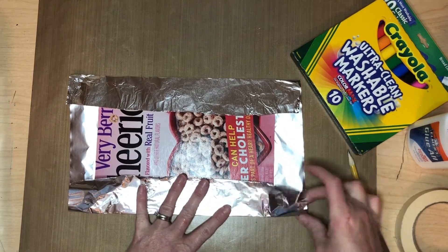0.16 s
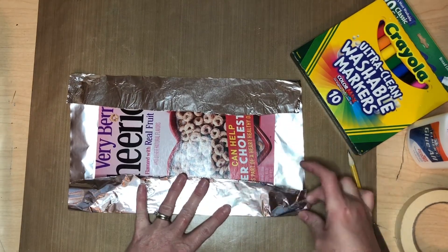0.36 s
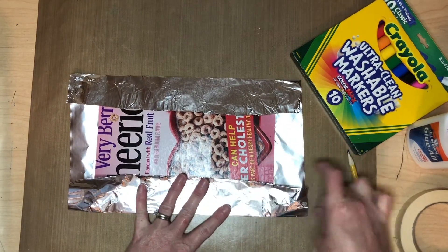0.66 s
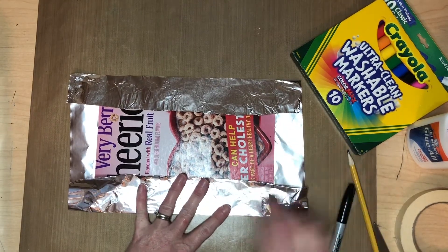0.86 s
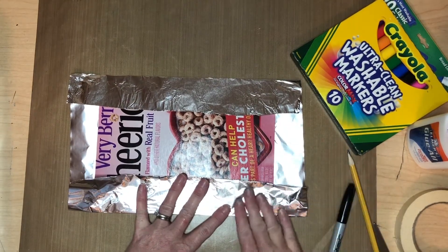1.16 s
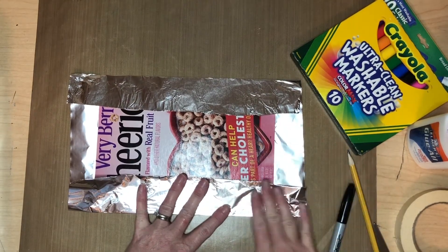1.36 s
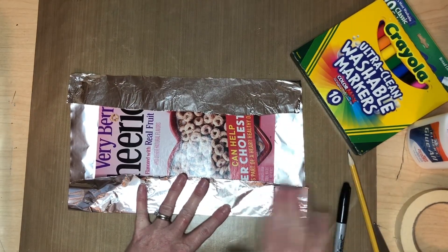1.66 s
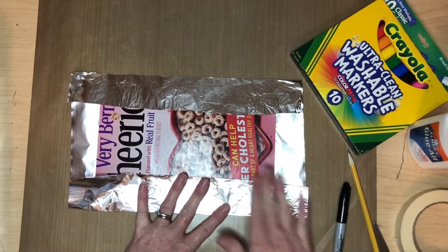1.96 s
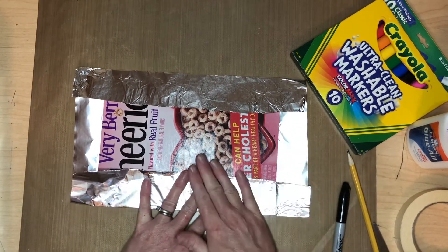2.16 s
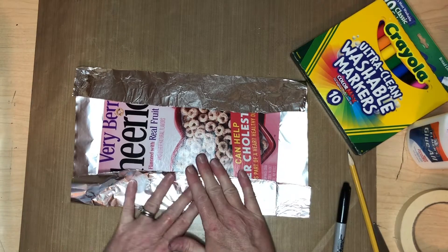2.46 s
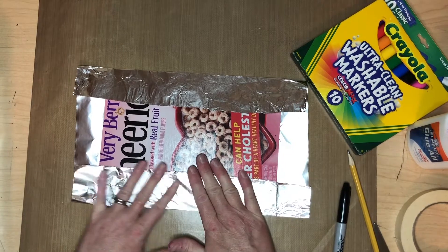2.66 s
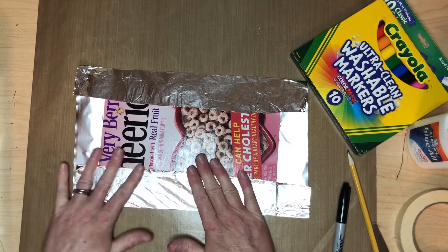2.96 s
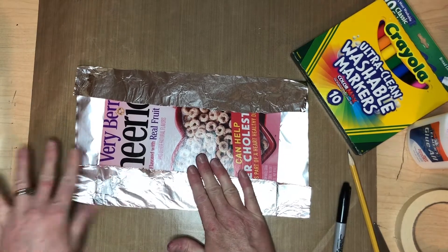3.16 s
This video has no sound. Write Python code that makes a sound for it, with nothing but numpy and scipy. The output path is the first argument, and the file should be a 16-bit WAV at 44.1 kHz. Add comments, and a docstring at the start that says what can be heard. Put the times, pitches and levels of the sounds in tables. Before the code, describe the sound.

Aluminium foil crackles and snaps as hands fold it around cardboard and smooth it flat.

```python
"""Aluminium foil crackles and snaps as hands fold it round a piece of cardboard and smooth it flat,
on a table close to the microphone in a small room. Creases buckle with sharp snaps over the fine
crackle of tiny wrinkles; a loose flap scrapes and gliding fingers hiss. The hands thump the table,
and the card's edge knocks down twice as the left hand lets go."""
import sys
import numpy as np
from scipy import signal
from scipy.io import wavfile

SR = 44100
rng = np.random.default_rng(int(sys.argv[2]) if len(sys.argv) > 2 else 0)


def wav_record(signal):
    """Record a signal, one row per channel, as 16-bit PCM in the file named by sys.argv[1]."""
    frames = np.transpose(np.atleast_2d(signal))
    bounded = np.clip(frames, -1, 1)
    # unit amplitude maps onto the largest positive 16-bit level
    quanta = np.round(bounded * 32767).astype(np.int16)
    wavfile.write(sys.argv[1], SR, quanta)


N = 145530

# Levels are relative; gains further down offset them.
# room tone: f/Hz, level/dB
ROOM_TONE = [(20, -22), (55, 0), (130, 0), (250, -1), (600, -7), (1000, -11), (1700, -10.5), (2500, -16.5),
             (6000, -22), (10000, -29.5), (16000, -40)]
# faint ring at the start: f/Hz, level/dB, t60/s
OPENING_MODES = [(590, -67.5, 0.98), (680, -56, 0.13), (1680, -70, 0.76), (1680, -62, 0.19),
                 (2250, -62, 0.15), (3100, -54, 0.16), (4530, -54, 0.14)]

# crackle under the fingers: t/s, treble level/dB, upper-mid level/dB
RUB_LEVELS = [(0, -62.5, -51.5), (0.06, -71, -65.5), (0.12, -100, -80), (0.14, -47.5, -46.5),
              (0.19, -62, -51.5), (0.22, -52, -51), (0.28, -50, -45.5), (0.36, -60, -56),
              (0.42, -72, -65.5), (0.45, -55, -60), (0.485, -61, -55), (0.515, -65, -56),
              (0.55, -53.5, -52.5), (0.6, -40.5, -41.5), (0.645, -46, -49), (0.67, -58.5, -78),
              (0.76, -77, -93), (0.975, -105, -99), (1.03, -46, -48), (1.13, -59, -51), (1.18, -58, -55),
              (1.28, -51, -53), (1.36, -44.5, -52), (1.44, -49.5, -53.5), (1.51, -59, -54.5),
              (1.6, -56.5, -66), (1.63, -80, -57), (1.66, -80, -100), (1.76, -82, -78), (1.785, -49, -54.5),
              (1.87, -50, -58), (1.94, -66, -64.5), (2.05, -55.5, -59), (2.08, -47, -48.5),
              (2.135, -57.5, -56), (2.225, -54, -46.5), (2.27, -59, -57), (2.32, -54, -50),
              (2.39, -50.5, -51), (2.48, -58, -57), (2.55, -50.5, -46), (2.63, -35.5, -42),
              (2.69, -48.5, -50.5), (2.74, -43.5, -50.5), (2.79, -51, -56.5), (2.875, -40.5, -49),
              (2.915, -52.5, -47.5), (2.945, -64, -67), (2.98, -51.5, -49), (3.03, -52.5, -61.5),
              (3.09, -46, -50), (3.145, -49, -57.5), (3.18, -87, -75), (3.29, -93, -82)]
# low rustle of foil and card: t/s, level/dB
FLEX_LEVEL = [(0, -56), (0.12, -74.5), (0.14, -88), (0.28, -78), (0.42, -86), (0.45, -82), (0.55, -76),
              (0.645, -86), (0.7, -72), (0.975, -100), (1.03, -69), (1.4, -71), (1.6, -80), (1.76, -69),
              (1.785, -56), (1.95, -68), (2.05, -65.5), (2.14, -55.5), (2.205, -58.5), (2.235, -47.5),
              (2.27, -57.5), (2.48, -66.5), (2.62, -56), (2.83, -57), (2.9, -52.5), (2.945, -61.5),
              (3.1, -56.5), (3.19, -72), (3.29, -71)]
# spectra of the crackle's treble, upper mids and low rustle: f/Hz, level/dB
TREBLE_TONE = [(3000, -27), (5200, -7), (6700, -1.5), (9200, -2.5), (12000, -9), (16000, -9)]
MID_TONE = [(900, -15), (2000, -5.5), (3400, 0), (5200, -3.5), (7000, -8), (12000, -47)]
FLEX_TONE = [(40, -17), (120, 8.5), (300, 0.5), (550, 4.5), (850, -2), (1200, 5), (2000, 4), (3000, -20.5),
             (6000, -24.5)]
# smooth hiss in the crackle, small while folding, large while sliding: t/s, share (0-1)
HISS_SHARE = [(.5, .25), (.6, .6), (.7, .9), (1, .5), (1.35, .5), (1.5, .85), (2, .8), (2.1, .35),
              (2.48, .4), (2.58, .8), (2.9, .9)]
GRAINS_PER_S, GRAIN_SPREAD_DB, GRAIN_S = 1100, 2, 0.00051
TICKS_PER_S, TICK_SPREAD_DB, TICK_DB = 130, 2, 8  # sharper single wrinkles
FLUTTER_DB, FLUTTER_HZ = 2.56, 66.5  # the fingertips grip and slip
BEND_DB, BEND_HZ, SHAPE_S = 2.1, 150, .04  # foil resonances: depth, width, time in one shape

# creases buckling: t/s, ring f/Hz, ring level/dB, crack level/dB, flap level/dB
CREASES = [(0.1315, 4050, -45, -64, -58), (0.1404, 3320, -44, -53, -45.5), (0.1466, 4400, -49, -51, -58),
           (0.186, 3570, -48, -60, -57), (0.2018, 3380, -34, -35.5, -38.5),
           (0.2079, 4230, -36.5, -55, -40.5), (0.2277, 3380, -48, -52, -59),
           (0.2821, 3450, -39.5, -60, -42.5), (0.2924, 7600, -36.5, -44, -47),
           (0.3185, 2850, -36.5, -44.5, -51), (0.3466, 4100, -44, -61, -56),
           (0.3771, 2950, -45.5, -70, -51.5), (0.3948, 3040, -42, -58, -53), (0.4305, 3170, -47, -72, -49),
           (0.438, 3030, -38, -41.5, -43.5), (0.458, 3470, -45.5, -56, -59),
           (0.4635, 3300, -42, -46.5, -47.5), (0.502, 2770, -46, -69, -47.5),
           (0.5102, 3400, -45.5, -45.5, -45), (0.5215, 7000, -47, -48, -53),
           (0.5271, 2400, -47.5, -64, -51), (0.6135, 3400, -34.5, -71, -46.5),
           (0.6276, 3260, -36.5, -60, -43.5), (0.6413, 3900, -33, -41, -55),
           (0.6456, 4040, -39.5, -57, -45.5), (0.9881, 3950, -44, -45, -49), (1.024, 4000, -45, -52, -52),
           (1.0485, 3980, -42, -44, -47), (1.0543, 4950, -34.5, -61, -50), (1.081, 10200, -39.5, -42, -57),
           (1.1445, 4140, -33, -46, -53), (1.1665, 9000, -39, -43, -50), (1.1788, 6000, -32.5, -45, -57.5),
           (1.193, 5800, -32, -42.5, -40), (1.203, 4230, -36.5, -51, -79), (1.234, 4870, -33, -38.5, -60),
           (1.2372, 4600, -32, -37, -64), (1.2549, 4370, -36.5, -60, -62), (1.2632, 6640, -33, -44, -58),
           (1.297, 4400, -45, -66, -39), (1.3089, 4140, -36.5, -33, -49), (1.336, 7160, -32, -54, -68),
           (1.3414, 6500, -42, -37, -61), (1.3482, 7400, -39.5, -57, -64), (1.3558, 9500, -47, -39, -52),
           (1.3967, 6740, -44, -64, -74), (1.4101, 7060, -34.5, -43, -60), (1.423, 7750, -44, -53, -74),
           (1.4333, 9100, -45, -37, -55), (1.4735, 5000, -51, -55, -57), (1.4915, 4200, -48, -60, -66),
           (1.6245, 10000, -52, -56, -74), (1.7714, 10000, -30, -36, -43.5), (1.802, 9500, -47, -47, -66),
           (1.8565, 8700, -36.5, -44, -72), (2.0685, 9100, -61, -43.5, -44),
           (2.0807, 2460, -44, -42, -35.5), (2.0851, 8400, -35, -39, -35.5), (2.128, 8850, -63, -59, -71),
           (2.165, 4600, -42.5, -42.5, -44), (2.18, 3970, -47, -55, -49), (2.1855, 4930, -36.5, -40.5, -49),
           (2.2172, 5930, -45.5, -48.5, -45.5), (2.2372, 9500, -63, -48, -46), (2.258, 9000, -65, -52, -51),
           (2.2864, 9650, -36.5, -39.5, -65), (2.302, 5700, -38, -40, -48.5), (2.3368, 8300, -58, -48, -73),
           (2.3486, 6300, -35, -37, -72), (2.3751, 9650, -43.5, -39.5, -50),
           (2.4109, 7800, -36, -38.5, -47), (2.4418, 7400, -32.5, -35, -44),
           (2.4967, 8400, -49.5, -51, -45.5), (2.5299, 3300, -40, -53, -51), (2.5338, 9500, -45, -38, -48),
           (2.5747, 3100, -40, -57, -46), (2.5987, 7800, -49, -44, -44), (2.6109, 7160, -49, -49, -51),
           (2.6324, 5040, -40.5, -44, -49), (2.816, 6750, -42.5, -64, -46), (2.9574, 6960, -44.5, -49, -44),
           (3.109, 7200, -54, -43, -49), (3.139, 7860, -60, -43, -66), (3.1555, 9600, -43.5, -44.5, -53.5)]
# spectra of a snap's ring, top-end crack and low flap of the sheet: f/Hz, level/dB
RING_TONE = [(900, -64.5), (2000, -8.5), (3200, -1), (5000, -2), (8500, 0.5), (11000, -11.5), (16000, -22)]
CRACK_TONE = [(4000, -20.5), (7800, -3.5), (9500, 4.5), (12500, -4.5), (16000, -6)]
FLAP_TONE = [(200, -22.5), (700, -27.5), (1000, -7), (1250, -2.5), (1800, -7), (2600, -9), (5000, -62)]
# a crease rattles long in loose foil, briefly when pressed on the card: t/s, decay/s
RATTLE_DECAY = [(.13, 0.0088), (.3, 0.0038), (.65, 0.0079), (1.04, 0.0087), (1.06, 0.0018), (1.15, 0.0016),
                (1.25, 0.0006), (1.31, 0.0027), (1.41, 0.00042), (1.77, 0.0054), (2.09, 0.0029),
                (2.128, .0006), (2.187, 0.0054), (2.24, 0.00065), (2.3, .005), (2.35, 0.005),
                (2.53, 0.0074), (2.6, 0.00062), (3.15, 0.0018)]
# a taut crease gives way at once, a rolling one gradually: t/s, rise/s
CREASE_RISE = [(.2, .002), (.28, .0003), (.44, .0003), (.465, .002), (.99, .003), (1.049, .001), (1.054, 0),
               (1.49, 0), (1.62, .004), (1.77, .0004), (1.86, .0015), (2.165, .0003), (2.187, .003),
               (2.286, .0005), (2.303, .003), (2.34, 0), (2.44, .001), (2.58, 0)]
RING_OCTAVES, RING_LIFT_DB = 0.34, 9.5  # peak round each crease's own pitch
REFLECTION_S, REFLECTION_DB = .003, -7  # typical delay and level of a reflection of the pulse
RATTLE_DB, CRACK_DB, FLAP_DB, FLAP_S = -16, 1.5, -5.5, 0.0062
SPREAD_S, SPREAD_DB = 0.0092, -13  # the snap spreads through the whole sheet

# a raised flap scraping: t/s, length/s, level/dB
FLAP_SCRAPES = [(0.13, 0.042, -53), (0.202, 0.01, -38), (0.22, 0.082, -58), (0.427, 0.022, -60),
                (2.08, 0.015, -47), (2.21, 0.053, -51.5)]
# air pocket under the flap: f/Hz, level/dB
POCKET_TONE = [(600, -40), (950, -9.5), (1120, -3.5), (1330, 3.5), (1480, -9.5), (1700, -31), (2600, -45)]
# hands patting the card on the table: t/s, pat level/dB, pat f/Hz, table level/dB
HAND_PATS = [(0.289, -60, 143, -73), (0.317, -49.5, 397, -66.5), (.99, -45, 134, -58),
             (1.77, -42.5, 288, -65), (1.776, -31.5, 124.5, -42), (1.855, -49.5, 151, -59.5),
             (2.083, -36, 243, -64), (2.092, -39, 121, -45), (2.574, -54, 89, -68), (2.75, -48.5, 315, -64),
             (2.782, -41.5, 123, -64), (2.806, -40.5, 270, -59), (2.984, -42, 289, -64.5)]
PAT_CYCLES = 1.33  # a pat swells over this many cycles, then the flesh damps it
# modes of the table: f/Hz, level/dB, t60/s
TABLE_MODES = [(59, -2, 0.27), (111, 10, 0.067), (136.5, 6, 0.26), (169, -7.5, 0.14), (222, -9, 0.19),
               (268, -4, 0.18), (372, -13.5, 0.12), (407, 3, 0.035)]
# hand pressing along the fold, palm brushing the card: t/s, level/dB
PRESS_LEVEL = [(1.05, -100), (1.15, -57.5), (1.33, -60), (1.6, -79), (2.1, -70), (2.5, -70), (2.6, -61.5),
               (2.75, -73), (3.0, -64), (3.2, -110)]
PALM_LEVEL = [(.98, -70.5), (1.1, -68), (1.3, -65), (1.42, -55.5), (1.52, -64.5), (1.65, -78.5),
              (2.05, -66.5), (2.2, -66.5), (2.45, -62.5), (2.56, -51), (2.7, -76), (2.78, -52.5),
              (2.95, -61.5), (3.05, -74), (3.2, -69)]
# low rumble of the pressing, dull brush of the palm: f/Hz, level/dB
PRESS_TONE = [(20, -19), (48, 0.5), (70, -2), (130, -7.5), (280, -41), (600, -49), (1500, -83)]
PALM_TONE = [(80, -24), (170, -9.5), (270, 3), (420, -2), (620, -12.5), (1200, -17)]
# the card's edge tapping down: t/s, level/dB
EDGE_KNOCKS = [(1.296, -61), (2.8599, -32), (2.8736, -32)]
# modes of the card: f/Hz, level/dB, t60/s
CARD_MODES = [(437, 1, 0.011), (606, -4.5, 0.039), (665, -7, 0.032), (932, -3.5, 0.025), (1136, -9.5, 0.1),
              (1165, -8, 0.084), (1234, 2, 0.027), (1430, -1, 0.012), (1660, -4, 0.021), (2030, -5.5, 0.02)]
# fingers gliding over flat foil: t/s, length/s, level/dB
STROKES = [(1.31, 0.28, -53), (1.78, 0.16, -54), (1.598, 0.045, -62), (2.3, 0.12, -55)]
# bright sheen of a stroke: f/Hz, level/dB
STROKE_TONE = [(3000, -26), (7000, -6), (10000, -2), (15000, -6)]

# decay of the small room: f/Hz, t60/s
ROOM_DECAY = [(100, 0.4), (1000, 0.36), (4000, 0.26), (9000, 0.14), (16000, 0.076)]
# resonances of the table and its surroundings: f/Hz, width/Hz, lift/dB
TABLE_RESONANCES = [(751, 32, 6), (1057, 24, 2), (3590, 130, 2.5), (4600, 49, 2.5), (5720, 35, -1),
                    (6100, 57, 2)]
TAIL_DB, EARLY_DB, EARLY_S = -16.5, -10.5, 0.0037
ECHO_LOW_CUT_HZ = 300  # low cut on the echo, keeping the bass dry

TIME = np.arange(N) / SR
BIN_HZ = np.fft.rfftfreq(4096, 1 / SR)


def amp(db):
    """Decibels to gain."""
    return 10 ** (np.asarray(db) / 20)


def unit(x):
    """Scales to rms 1."""
    return x / np.sqrt(np.mean(x ** 2) + 1e-20)


def spectrum(points, hz=BIN_HZ):
    """Interpolates a table on a log-frequency axis."""
    f, value = np.transpose(points)
    return np.interp(np.log(hz + 1), np.log(f), value)


def level(points, column=1):
    """One dB column of a time curve, as gain per sample."""
    rows = np.array(points)
    return amp(np.interp(TIME, rows[:, 0], rows[:, column]))


def add(mix, s, sound):
    """Adds a sound into the mix at time s."""
    part = mix[max(0, round(s * SR)):][:len(sound)]
    part += sound[:len(part)]


def colour(x, db):
    """Minimum-phase filter with the given dB per bin."""
    log_gain = np.log(amp(np.r_[db, db[-2:0:-1]]))
    taps = np.fft.ifft(np.exp(np.conj(signal.hilbert(log_gain)))).real
    return signal.fftconvolve(x, taps[:len(db)])[:len(x)]


def noise(tone):
    """Steady noise of rms 1 with the given spectrum."""
    return unit(colour(rng.standard_normal(N), spectrum(tone)))


def ring(modes):
    """The dying modes of a struck body, alternating in sign."""
    t = np.arange(SR // 3) / SR
    return sum(amp(db) * np.exp(-np.log(1000) * t / t60) * np.sin(2 * np.pi * hz * t) * (-1) ** k
               for k, (hz, db, t60) in enumerate(modes))


def background(tone_db=-72.5, rise_s=0.0024):
    """Quiet room tone, with a faint ring dying away at the start."""
    out = amp(tone_db) * noise(ROOM_TONE)
    fading = ring(OPENING_MODES)
    add(out, 0, fading * np.minimum(TIME[:len(fading)] / rise_s, 1))
    return out


def foil_shape():
    """Random resonances of the foil in one of its shapes, in dB per bin."""
    knots = np.arange(0, SR / 2, BEND_HZ)
    return BEND_DB * np.interp(BIN_HZ, knots, rng.standard_normal(len(knots)))


def bending(x):
    """The foil passes from one shape to the next, so its resonances keep shifting."""
    out, hop = np.zeros(N), round(SHAPE_S * SR)
    padded = np.pad(x, (hop, 2 * hop))
    window = np.sin(np.pi * np.arange(2 * hop) / (2 * hop)) ** 2
    for start in range(0, N + hop, hop):
        part = colour(padded[start:start + 2 * hop] * window, foil_shape())
        add(out, (start - hop) / SR, part[max(0, hop - start):])
    return out


def crackle(treble_db=-0.5, mid_db=-2, flex_db=-1.5):
    """Tiny wrinkles give way under the fingers: ticks while folding, smoother hiss while sliding."""
    wrinkles = amp(GRAIN_SPREAD_DB * np.minimum(rng.exponential(1, N), 5))
    wrinkles *= rng.random(N) < GRAINS_PER_S / SR
    power = signal.lfilter([1], [1, -np.exp(-2 / (GRAIN_S * SR))], wrinkles ** 2)
    smooth = np.interp(TIME, *np.transpose(HISS_SHARE))
    envelope = np.sqrt(smooth + (1 - smooth) * power / power.mean())
    grip = signal.sosfilt(signal.butter(2, FLUTTER_HZ, fs=SR, output="sos"), rng.standard_normal(N))
    envelope *= amp(FLUTTER_DB * unit(grip))
    ticks = 2 * (1 - smooth) * amp(TICK_DB + TICK_SPREAD_DB * np.minimum(rng.exponential(1, N), 3))
    ticks *= rng.random(N) < TICKS_PER_S / SR
    out = np.zeros(N)
    for tone, db, gain in [(TREBLE_TONE, treble_db, level(RUB_LEVELS)),
                           (MID_TONE, mid_db, level(RUB_LEVELS, column=2)),
                           (FLEX_TONE, flex_db, level(FLEX_LEVEL))]:
        drive = ticks + envelope * rng.standard_normal(N)
        out += amp(db) * gain * unit(colour(drive, spectrum(tone)))
    return bending(out)


def scrapes(fade_s=0.0057):
    """Short slides of the loose flap, heard through the air pocket under it."""
    gate = np.zeros(N)
    for s, length, db in FLAP_SCRAPES:
        gate += amp(db) * np.clip(np.minimum(TIME - s, s + length - TIME) / fade_s, 0, 1)
    return gate * noise(POCKET_TONE)


def snaps():
    """A crease buckles with a pulse and a rattle, and a weaker reflection of the pulse follows; the sheet rings
    and its flap clacks."""
    out = np.zeros(N)
    t = np.arange(0, .06, 1 / SR)
    attack = t < .005  # the first 5 ms set each part's level
    ring_tone, crack_tone, flap_tone = map(spectrum, (RING_TONE, CRACK_TONE, FLAP_TONE))
    spread, flap = np.exp(-t / SPREAD_S), np.exp(-t / FLAP_S)
    for s, ring_hz, ring_db, crack_db, flap_db in CREASES:
        hiss = rng.standard_normal((5, len(t)))
        rattle = amp(RATTLE_DB) * np.exp(-t / np.interp(s, *np.transpose(RATTLE_DECAY)))
        rise_s = np.interp(s, *np.transpose(CREASE_RISE))
        rise = np.minimum((t + 1 / SR) / (rise_s + 1 / SR), 1)
        pulses = np.zeros(len(t))
        add(pulses, rise_s, np.ones(1))
        add(pulses, rise_s + REFLECTION_S * rng.uniform(0.38, 1.6), amp([REFLECTION_DB]))
        peak = RING_LIFT_DB * np.exp(-.5 * (np.log2((BIN_HZ + 1) / ring_hz) / RING_OCTAVES) ** 2)
        shape = foil_shape()
        for drive, tone, db in [(pulses + hiss[0] * rattle, ring_tone + peak, ring_db),
                                (pulses + hiss[1] * rattle, crack_tone, crack_db + CRACK_DB),
                                (hiss[2] * spread, ring_tone, ring_db + SPREAD_DB),
                                (hiss[3] * spread, crack_tone, crack_db + SPREAD_DB),
                                (hiss[4] * flap, flap_tone, flap_db + FLAP_DB)]:
            part = colour(drive * rise, tone + shape)
            add(out, s, part * amp(db) / np.std(part[attack]))
    return out


def pats():
    """Damped pats that set the table ringing: tight, dry thuds without room echo."""
    out, t = np.zeros(N), np.arange(SR // 10) / SR
    for s, pat_db, pat_hz, table_db in HAND_PATS:
        progress = t * pat_hz / PAT_CYCLES
        swell = (progress * np.exp(1 - progress)) ** 2
        add(out, s, amp(pat_db) * swell * np.sin(2 * np.pi * pat_hz * t))
        add(out, s, amp(table_db) * ring(TABLE_MODES))
    return out


def pressing():
    """The hand rumbles along the fold and the palm brushes the card."""
    return level(PRESS_LEVEL) * noise(PRESS_TONE) + level(PALM_LEVEL) * noise(PALM_TONE)


def knocks():
    """The card's edge taps the table and the card rings briefly."""
    out = np.zeros(N)
    for s, db in EDGE_KNOCKS:
        add(out, s, amp(db) * ring(CARD_MODES))
    return out


def glides():
    """Fingers on flat foil: a bright hiss that swells and fades with each smoothing stroke."""
    swell = np.zeros(N)
    for s, length, db in STROKES:
        swell += amp(db) * np.sin(np.pi * np.clip((TIME - s) / length, 0, 1))
    return swell * noise(STROKE_TONE)


def room(direct):
    """At the microphone: direct sound, quick table reflections, then a short tail that dulls."""
    t = np.arange(SR // 2) / SR
    hz, when, frames = signal.stft(rng.standard_normal(len(t)), SR, nperseg=256)
    decay = np.exp(-np.log(1000) * when / spectrum(ROOM_DECAY, hz)[:, None])
    tail = signal.istft(frames * decay, SR, nperseg=256)[1][:len(t)] * (t > .006)
    early = rng.standard_normal(len(t)) * (rng.random(len(t)) < .04)
    early *= np.exp(-t / EARLY_S) * (t > .002)
    echo = amp(TAIL_DB) * tail / np.linalg.norm(tail) + amp(EARLY_DB) * early / np.linalg.norm(early)
    echo = signal.sosfilt(signal.butter(2, ECHO_LOW_CUT_HZ, "high", fs=SR, output="sos"), echo)
    lift = sum(db / (1 + ((BIN_HZ - hz) / width) ** 2) for hz, width, db in TABLE_RESONANCES)
    return colour(direct + signal.fftconvolve(direct, echo)[:N], lift)


def scene():
    """Foil, card and hands close to one microphone, over faint room tone."""
    ambience = background()
    handling = room(snaps() + crackle() + glides() + scrapes() + pressing() + knocks()) + pats()
    return (amp(-2.0) * handling + ambience)[None]


def record(dry):
    """The recorder cuts off the highest treble from the microphone."""
    lowpass = signal.firwin(301, cutoff=15800, window=("kaiser", 7), fs=SR)
    return signal.oaconvolve(dry, lowpass[None], "same")


dry = scene()
out = record(dry)
wav_record(out)
```